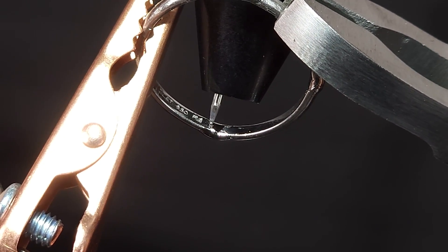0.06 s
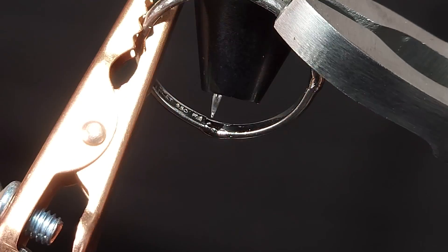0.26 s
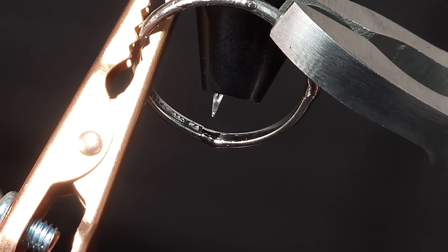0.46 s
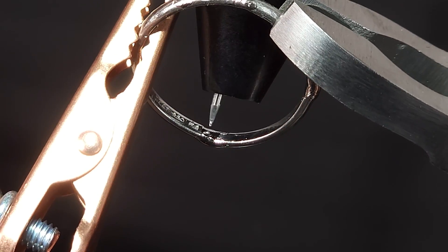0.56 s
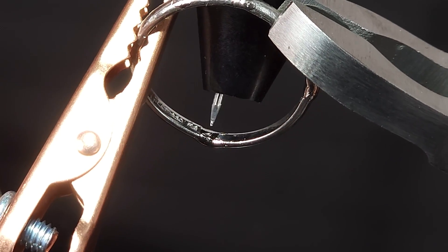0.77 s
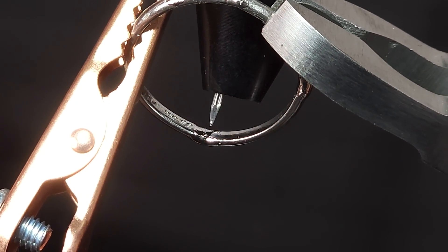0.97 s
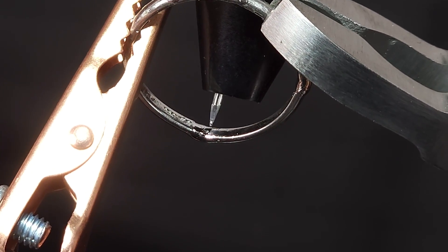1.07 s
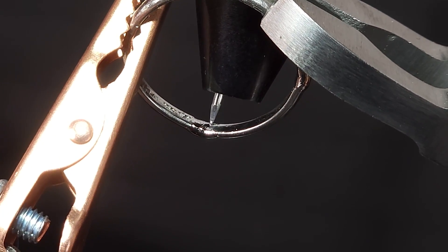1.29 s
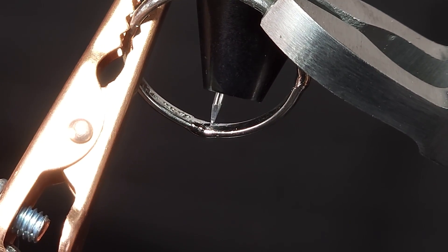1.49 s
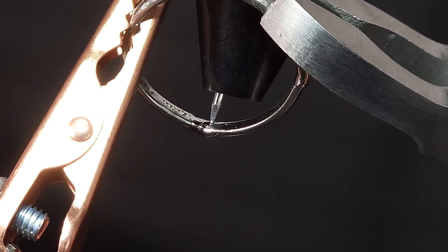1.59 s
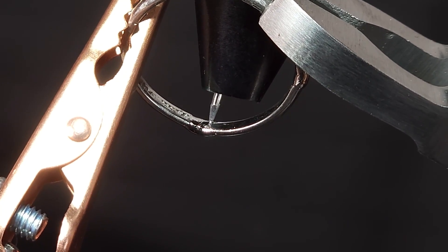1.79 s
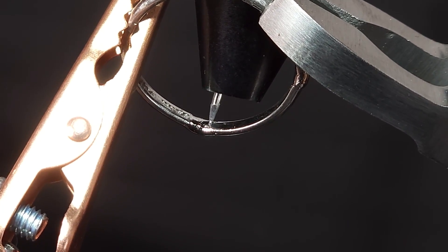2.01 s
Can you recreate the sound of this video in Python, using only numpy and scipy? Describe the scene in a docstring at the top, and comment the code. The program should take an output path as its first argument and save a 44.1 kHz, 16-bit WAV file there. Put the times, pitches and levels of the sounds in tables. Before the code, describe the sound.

A micro arc welder fires once at 0.23 s: a loud crack, a harsh 11 ms buzz near 2.5 kHz with bright overtones, and a second crack, with a short small-room tail. The electrode clicks back at 0.55 s. A soft valve knock at 0.8 s ends the faint, easing gas hiss. Low fan rush and hum continue; at 1.79 s a sharp airy spurt restarts the hiss.

```python
"""A jeweller's bench in a small room, in stereo: a fan rushes and hums behind everything, gas hisses and eases.
At 0.23 s a micro arc welder fires on a ring: a snap of noise, an 11 ms buzz of chopped-current tones, a second snap.
At 0.55 s the electrode clicks back, a burst of noise over ringing modes of the handpiece and its housing.
At 0.80 s the gas valve shuts with a soft modal knock and the hiss stops.
At 1.79 s it opens with a sharp spurt of noise and the hiss returns; a near wall and a short tail answer."""
import sys
import numpy as np
from scipy import signal
from scipy.fft import rfft, irfft, next_fast_len
from scipy.io import wavfile
from scipy.ndimage import map_coordinates

SR = 44100
rng = np.random.default_rng(int(sys.argv[2]) if len(sys.argv) > 2 else 0)


def master(y):
    """Save y as 16-bit WAV."""
    cut = np.clip(np.atleast_2d(y).T, -1, 1)
    pcm = np.round(cut * 32767)  # scale
    wavfile.write(sys.argv[1], SR, pcm.astype(np.int16))


N = 90404
T = np.arange(N) / SR  # s

# In all tables: left-right is the lean to the left microphone; likeness is the correlation of the two
# microphones; colours are relative levels; mode levels are taken before the attack softens them.

# overtones of the chopped arc [multiple of the chopping rate, level/dB, left-right/dB,
# left-right phase/rad, room tail relative to the tone/dB]
ARC_TONES = [(1, -14.5, -6.5, 1.15, -7), (3, -11.5, -1, 1.65, -7), (5, -15.5, 4, 2.4, -12),
             (6, -33, 1.5, 1.5, -8)]
# hiss of the burning arc [f/Hz, level/dB]
SIZZLE_COLOUR = [(1500, -7), (3500, 0), (8000, -2), (16000, -4)]
# snaps as the arc strikes and breaks [t/s, level/dB, t60/s, left-right/dB]
SNAPS = [(0.2295, -8, 0.011, 2), (.2402, -10.5, .011, -3)]
# spectrum of the snaps [f/Hz, level/dB]
SNAP_COLOUR = [(100, -15.5), (550, -3.5), (950, -18.5), (1200, -2.5), (1450, 4), (1950, -13), (3200, 2.5),
               (4700, -1.5), (6000, -1.5), (10000, -8), (16000, -9)]
# left-right likeness of the snaps, sizzle and spurt [f/Hz, likeness]
SNAP_LIKENESS = [(600, .9), (1500, 0.59), (3000, .3), (6000, -0.44), (12000, 0.3)]
# modes of the bench under the weld [f/Hz, level/dB, t60/s]
BENCH_MODES = [(141, -38.5, 0.31), (243.5, -40, .26), (326, -46.5, 0.37), (591.3, -43.5, .25)]
# modes of the handpiece [f/Hz, level/dB, t60/s]
HANDPIECE_MODES = [(2025, -32, 0.02), (2303, -26.5, 0.016), (2820, -37.5, 0.039), (4640, -34.5, 0.032)]
# slower-building modes of the handpiece's housing [f/Hz, level/dB, t60/s]
HOUSING_MODES = [(696, -41, 0.058), (906, -36, 0.077), (1211, -28.5, 0.074)]
# spectrum of the returning electrode's click [f/Hz, level/dB]
RETURN_COLOUR = [(250, -25.5), (750, -1.5), (2400, 0.5), (3500, -5), (4600, 1.5), (5500, -6.5),
                 (7000, -7.5), (10000, -23.5), (12500, -17), (15000, -15)]
# modes of the closing gas valve [f/Hz, level/dB, t60/s]
VALVE_MODES = [(263.6, -48.5, 0.33), (316, -30, 0.028), (422, -36, 0.024), (587, -47.5, 0.2),
               (1190, -44.5, .03), (5448, -62, .06), (7020, -51, 0.055)]
# modes of the welder's case as the valve opens [f/Hz, level/dB, t60/s]
CASE_MODES = [(141, -45, 0.19), (234.5, -40, 0.068), (564, -54, 0.067)]
# spectrum of the opening spurt [f/Hz, level/dB]
SPURT_COLOUR = [(200, -9.5), (600, -13.5), (1400, -15.5), (2700, -12), (3800, -16), (5700, -13.5),
                (6500, -5), (7600, 3), (9000, -3), (10000, -0.5), (12000, -1), (15500, -9)]
# spectrum of the gas hiss and the valve's tick [f/Hz, level/dB]
GAS_COLOUR = [(1000, -6.5), (2500, 2), (3800, -5.5), (4750, 3.5), (5600, -6), (6800, -4), (8200, 4.5),
              (9300, -18), (11000, -13), (12500, -6), (15800, -8.5)]
# left-right likeness of the gas hiss [f/Hz, likeness]
GAS_LIKENESS = [(1000, .3), (8000, 0.11)]
# spectrum of the room and fan noise [f/Hz, level per Hz/dB]
AIR_COLOUR = [(20, -10.5), (44, -6), (74, -12.5), (107, -6), (146, -12), (250, -10.5), (460, -16.5),
              (950, -13.5), (1400, -14.5), (2300, -19.5), (3400, -27.5), (6000, -32.5), (7800, -31.5),
              (9000, -48.5), (15500, -48.5)]
# left-right likeness of the room and fan noise [f/Hz, likeness]
AIR_LIKENESS = [(60, 0.94), (180, 0.87), (550, 0.26), (1650, -0.05), (4970, -0.01), (15000, 0.04)]
# fan and mains hum lines [f/Hz, rms level/dB]
HUM_LINES = [(102.3, -66.5), (119.5, -65), (238, -68.5), (527.6, -73.5), (796.7, -74), (952.8, -72.5),
             (1346, -73.5)]
# left-right likeness of the clicks, ticks and room tail [f/Hz, likeness]
LIKENESS = [(200, 0.94), (600, .75), (1500, .45), (3000, .1), (10000, 0.029)]
# decay of the room tail [f/Hz, t60/s]
ROOM_DECAY = [(150, 0.26), (1000, .22), (2500, .29), (7500, 0.23), (12000, 0.17), (16000, .18)]

ARC_S, ARC_LENGTH_S, ARC_HZ = .2298, .0112, 2502  # ignition, burn time, rate of chopping the current
ARC_RISE_S, ARC_FALL_S, ARC_SWELL_DB = .0015, .0012, 6.5
CHOP_JITTER_RAD, SIZZLE_DB = .035, -29.5
PUSH_DB, PUSH_S = -21, 0.00061  # the shove of air; it changes sign after twice PUSH_S
RETURN_S = .5455  # the electrode meets its stop
SHUT_S, OPEN_S = .797, 1.7922  # the gas valve
GAS_DB, GAS_SAG_DB_PER_S, GAS_STOP_S = -57, 7.5, .03
AIR_DB = -53.5
WALL_S, WALL_DB = .0117, -12  # roughly 4 m of extra path
PEAK, TOP_HZ = .88, 16500  # ceiling of the rounded peaks, upper band limit


def arc():
    """The chopped current makes the arc sing, mostly on odd multiples, growing until it is cut."""
    t = T - ARC_S
    rise = np.clip(t / ARC_RISE_S, 0, 1)
    fall = np.clip((ARC_LENGTH_S - t) / ARC_FALL_S + .5, 0, 1)
    swell = amp(ARC_SWELL_DB * (np.clip(t / ARC_LENGTH_S, 0, 1) - 1))
    burn = rise * fall * swell
    phase = 2 * np.pi * ARC_HZ * t + CHOP_JITTER_RAD * drift(700)
    out = amp(SIZZLE_DB) * burn * noise(SIZZLE_COLOUR, SNAP_LIKENESS)
    for multiple, db, lean_db, lead_rad, wet_db in ARC_TONES:
        tone = np.sqrt(2) * amp(db) * burn * np.sin(multiple * phase)
        direct = pan(lean_db) * lead(tone, lead_rad)
        out = out + direct + wall(direct) + echo(tone, wet_db)
    return out


def snaps():
    """Striking and breaking each crack and shove the air, out then back; the bench rings under them."""
    cracks, push = np.zeros((2, N)), np.zeros(N)
    for k, (s, db, t60, lean_db) in enumerate(SNAPS):
        burst = decay(s, t60, attack_s=0.000199) * noise(SNAP_COLOUR, SNAP_LIKENESS)
        cracks += amp(db) * pan(lean_db) * burst
        u = np.maximum(T - s, 0) / PUSH_S
        sign = (-1) ** k  # air is pushed out at ignition, drawn back at the end
        push += sign * amp(PUSH_DB) * (u > 0) * (1 - u / 2) * np.exp(-u / 2)
    bench = ring(ARC_S, BENCH_MODES, attack_s=.004)
    return room(cracks, wet_db=-8.5) + room(push, wet_db=-6.5) + bench


def electrode():
    """The electrode slides back against its stop and rings the handpiece, then its housing."""
    click = amp(-23.0) * decay(RETURN_S, t60=.018, attack_s=.0003) * noise(RETURN_COLOUR, LIKENESS)
    tip = pan(7) * ring(RETURN_S, HANDPIECE_MODES, attack_s=.0004)
    housing = pan(8.1) * ring(RETURN_S, HOUSING_MODES, attack_s=0.0068)
    return room(pan(2) * click + tip, wet_db=-10.5) + housing


def valve():
    """It shuts with a dull knock, and opens with a bright spurt of pent-up gas that rings the case."""
    tick = amp(-51) * decay(SHUT_S, t60=.05, attack_s=.002) * noise(GAS_COLOUR, LIKENESS)
    knock = ring(SHUT_S, VALVE_MODES, attack_s=0.0021)
    spurt = amp(-16.0) * decay(OPEN_S, t60=0.023, attack_s=0.00089) * noise(SPURT_COLOUR, SNAP_LIKENESS)
    case = ring(OPEN_S, CASE_MODES, attack_s=.001)
    return room(knock + tick, wet_db=-7.5) + room(spurt, wet_db=-4.0) + case


def gas():
    """Gas hisses from the nozzle while the valve is open; the first flow eases as the pressure sags."""
    first = np.clip((SHUT_S - T) / GAS_STOP_S + 1, 0, 1) * amp(-GAS_SAG_DB_PER_S * T)
    second = np.clip((T - OPEN_S) / .1, 0, 1) * amp(-3.0)
    return amp(GAS_DB) * (first + second) * noise(GAS_COLOUR, GAS_LIKENESS)


def fan():
    """Steady rush of air with a few hum lines whose phase wavers slightly."""
    hum = np.zeros(N)
    for hz, db in HUM_LINES:
        hum += np.sqrt(2) * amp(db) * np.sin(2 * np.pi * hz * T + .7 * drift(5))
    return amp(AIR_DB) * noise(AIR_COLOUR, AIR_LIKENESS) + hum


def room(x, wet_db):
    """The sound with the near wall's and the room's answer."""
    return x + wall(x) + echo(x, wet_db)


def wall(x):
    """A single weak reflection off a near wall that reaches the right microphone a little louder."""
    return amp(WALL_DB) * pan(-2) * filtered(x, lambda hz: np.exp(-2j * np.pi * hz * WALL_S))


def echo(x, wet_db):
    """The room's short tail of decaying noise, at wet_db relative to x; the top treble dies soonest."""
    white = noise([(1, 0), (2, 0)], LIKENESS)[:, :SR // 2]
    hz, t, bands = signal.stft(white, SR, nperseg=256)
    fade = np.exp(-np.log(1000) * t / along(ROOM_DECAY, hz)[:, None])
    tail = signal.istft(bands * fade, SR, nperseg=256)[1]
    age = T[:tail.shape[1]]
    tail = tail * np.clip(age / 0.0047, 0, 1) * (1 + 0.17 * np.exp(-age / .012))  # a little stronger early on
    wet = signal.fftconvolve(np.broadcast_to(x, (2, N)), tail, axes=1)[:, :N]
    return amp(wet_db) * np.std(x) * unit(wet)


def pan(db):
    """Gains of the two microphones for a left-right difference."""
    return amp([[db / 2], [-db / 2]])


def lead(x, phase):
    """A mono sound at two microphones, the left one ahead in phase."""
    analytic = signal.hilbert(x, next_fast_len(N))[:N]
    return np.real(analytic * np.exp(.5j * phase * np.array([[1], [-1]])))


def ring(s, modes, attack_s):
    """Damped modes struck at time s."""
    out = np.zeros(N)
    for hz, db, t60 in modes:
        out += amp(db) * decay(s, t60, attack_s) * np.sin(2 * np.pi * hz * (T - s))
    return out


def decay(s, t60, attack_s):
    """Envelope of a blow at time s: a soft onset, then 60 dB of decay in t60."""
    t = np.maximum(T - s, 0)
    return np.exp(-np.log(1000) * t / t60) * (1 - np.exp(-t / attack_s))


def noise(colour, likeness):
    """Coloured stereo noise of rms 1; the mid-side balance sets the left-right likeness."""
    def response(hz):
        turn = np.arccos(np.clip(along(likeness, hz), -1, 1)) / 2
        return amp(along(colour, hz)) * np.array([np.cos(turn), np.sin(turn)])

    mid, side = filtered(rng.standard_normal((2, N)), response)
    return unit(np.array([mid + side, mid - side]))


def drift(rate):
    """A smooth random curve, rate knots a second."""
    knots = rng.standard_normal(int(N * rate / SR) + 4)
    return map_coordinates(knots, [T * rate])


def filtered(x, response):
    """x times a response of frequency, with silence padded behind it."""
    m = next_fast_len(N + SR // 2)
    return irfft(rfft(x, m) * response(np.fft.rfftfreq(m, 1 / SR)), m)[..., :N]


def along(points, hz):
    """(f/Hz, value) points interpolated on a log frequency axis."""
    f, v = np.transpose(points)
    return np.interp(np.log(hz + 1), np.log(f + 1), v)


def amp(db):
    """Gain for a level in dB."""
    return 10 ** (np.asarray(db) / 20)


def unit(x):
    """Scaled to rms 1."""
    return x / np.sqrt(np.mean(x ** 2) + 1e-20)


def scene():
    """One weld, then the gas valve opening again."""
    return arc() + snaps() + electrode() + valve() + gas() + fan()


def record(dry):
    """The loudest peaks are rounded off; the top ends steeply at the band limit."""
    rounded = dry / (1 + np.abs(dry / PEAK) ** 6) ** (1 / 6)
    return filtered(rounded, lambda hz: np.clip((TOP_HZ - hz) / 500, 0, 1) ** 2)


dry = scene()
out = record(dry)
master(out)
```